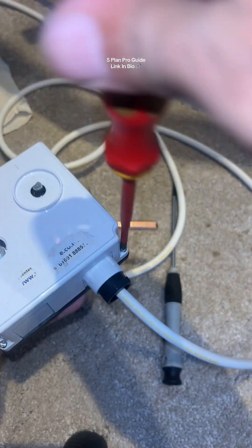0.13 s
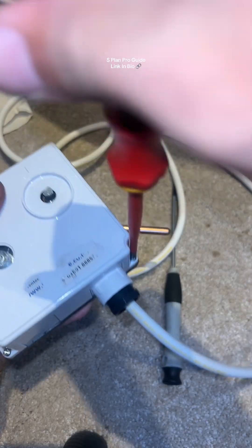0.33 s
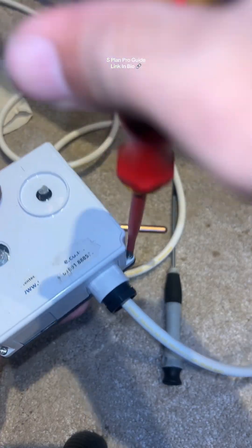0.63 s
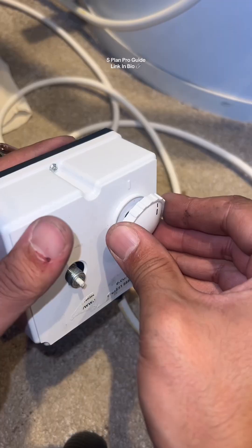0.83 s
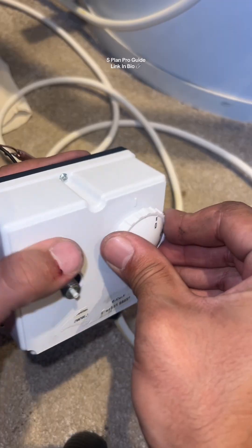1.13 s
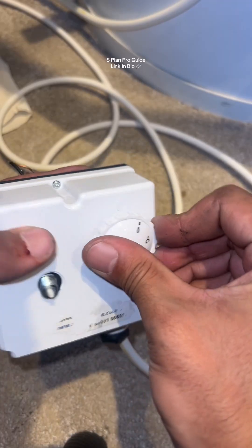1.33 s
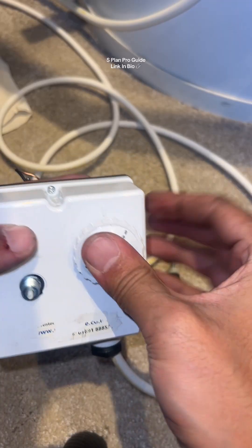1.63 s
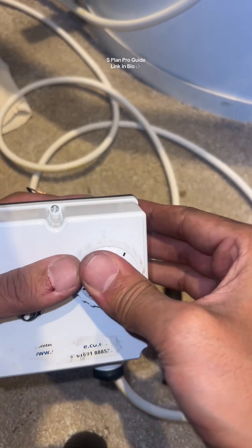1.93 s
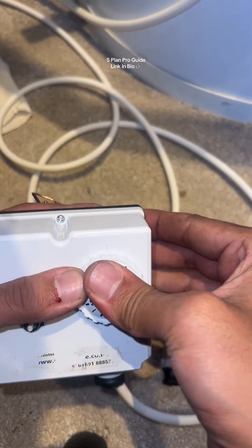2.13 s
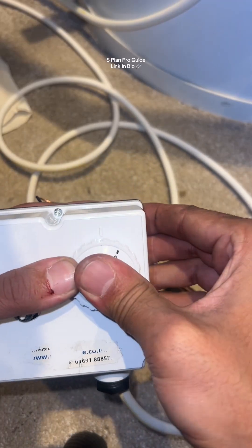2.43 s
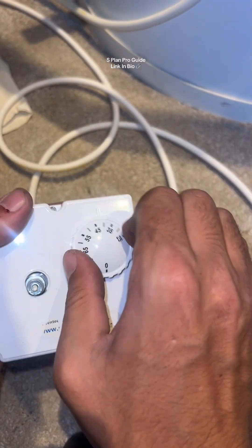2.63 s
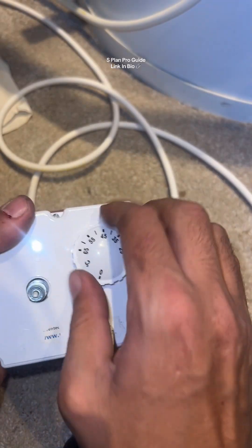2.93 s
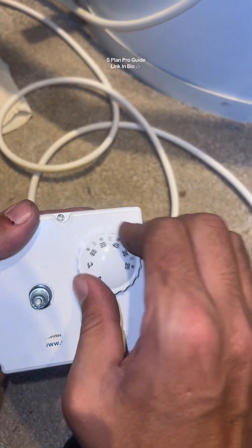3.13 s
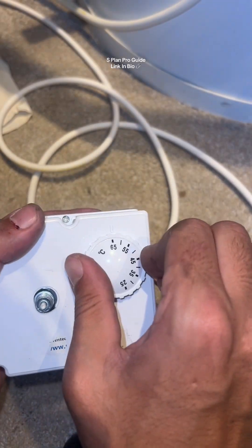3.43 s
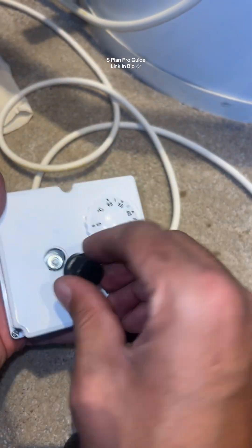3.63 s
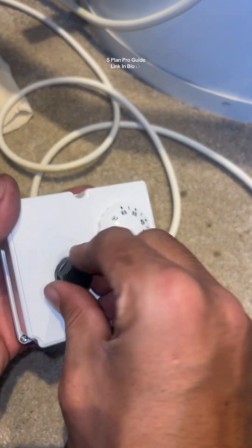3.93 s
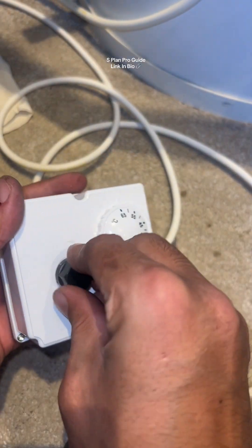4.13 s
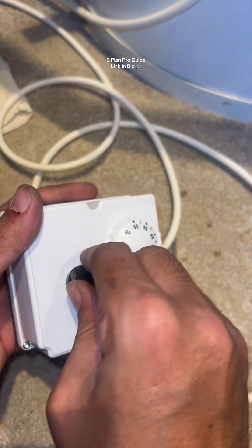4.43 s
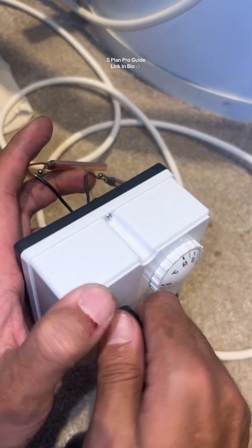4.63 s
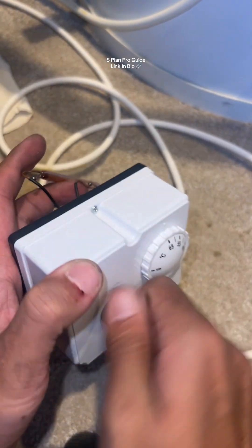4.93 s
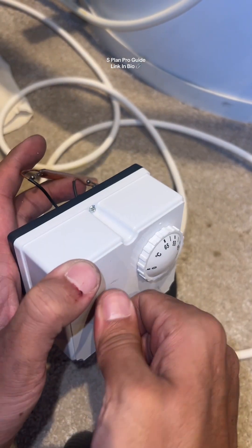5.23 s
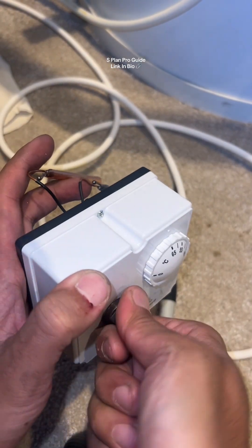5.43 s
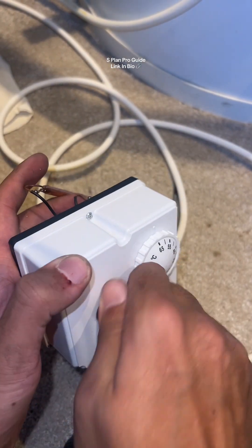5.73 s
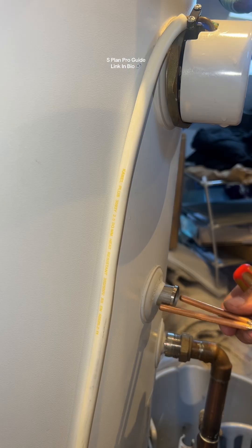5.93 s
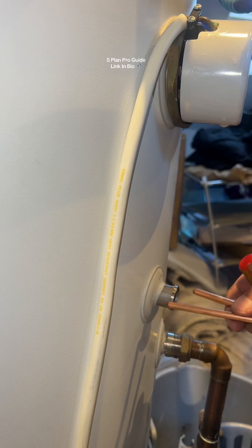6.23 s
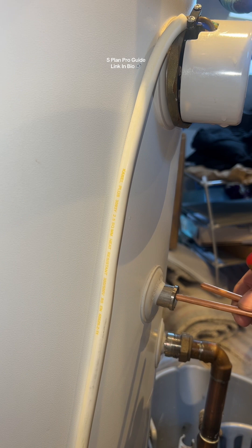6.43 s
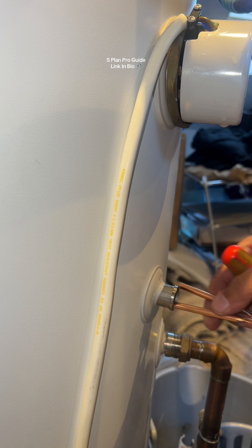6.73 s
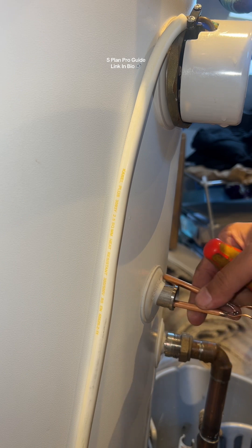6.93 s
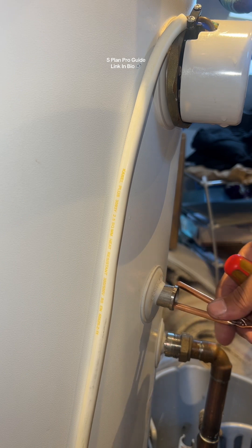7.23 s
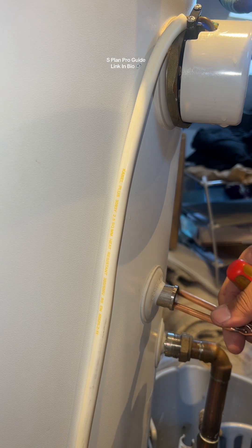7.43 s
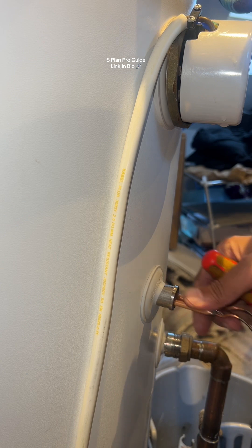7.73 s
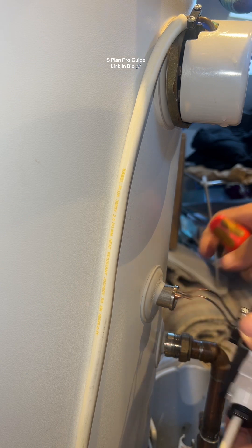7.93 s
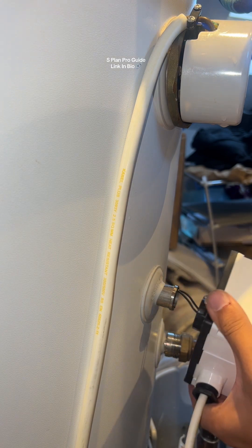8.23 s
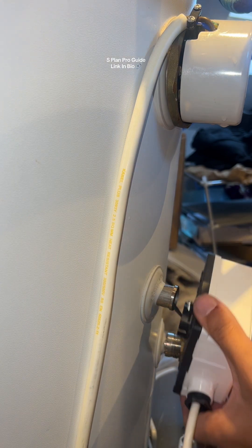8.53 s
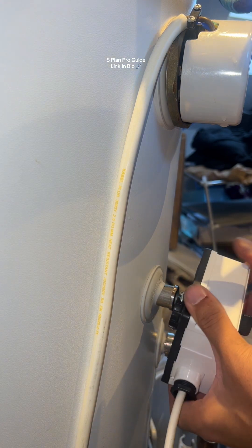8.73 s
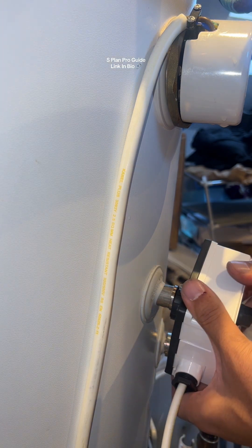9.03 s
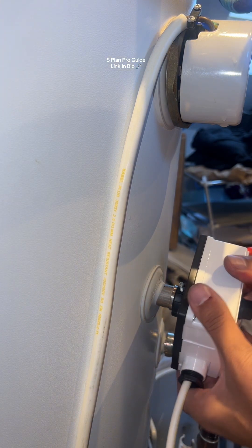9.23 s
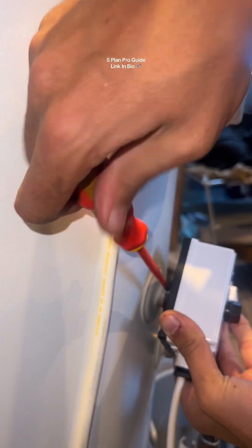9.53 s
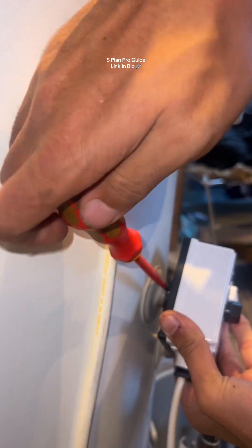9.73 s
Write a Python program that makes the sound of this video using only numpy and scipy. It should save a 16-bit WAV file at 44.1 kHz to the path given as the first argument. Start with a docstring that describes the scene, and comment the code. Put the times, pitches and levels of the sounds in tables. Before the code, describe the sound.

Close up in a small, dry carpeted room, fingers rustle over a hollow plastic box with small regular knocks. Sharp clicks stand out as a dial is handled and snapped on, then a cap is twisted with light ticks. Later thin copper probes squeak and scrape in a water tank's metal pocket, rattle in brightly, and the box knocks home with a dull thud. Low rumble underneath, with brief dropouts.

```python
"""Quick knocks and skin rustle on a plastic box come first, close by, over a low rumble in a small carpeted room.
Hands screw a thermostat box shut, snap a dial on and twist a cap tight. Then copper probes squeak and scrape
into the metal pocket of a water tank and the box knocks home. Knocks are short pushes of noise that ring lists
of decaying tones; rubbing is gritty noise through resonances; squeaks are sine waves. The sound drops out briefly
six times."""
import sys
import numpy as np
from scipy import signal
from scipy.fft import rfft, irfft
from scipy.io import wavfile
from scipy.ndimage import uniform_filter1d

SR = 44100
rng = np.random.default_rng(int(sys.argv[2]) if len(sys.argv) > 2 else 0)


def persist_wave(psi):
    """Save psi, clipped to +-1, as 16-bit WAV."""
    counts = np.round(np.clip(psi, -1, 1) * 32767).astype(np.int16)
    wavfile.write(sys.argv[1], SR, np.atleast_2d(counts).T)


def voltage_ratio(level):
    """Linear amplitude factor for a level in decibels (scalar or array-like)."""
    return 10 ** (np.asarray(level, float) / 20)


N = 435257  # length in samples
T = np.arange(N) / SR  # time in s


def colour(x, points):
    """Shape the tone of a sound by (Hz, dB) points, joined by straight lines on a log pitch axis."""
    hz, db = np.transpose(points)
    f = np.fft.rfftfreq(x.shape[-1], 1 / SR) + 1
    gain = voltage_ratio(np.interp(np.log(f), np.log(hz), db))
    return irfft(rfft(x) * gain, x.shape[-1])


def unit(x):
    """Scale to an rms level of 1."""
    return x / np.sqrt(np.mean(x ** 2))


def curve(rows, off=-120.):
    """Draw each column of a table against time; outside the table it takes the value off."""
    s, *columns = np.transpose(rows)
    return [np.interp(T, s, c, off, off) for c in columns]


def walk(rate):
    """Random levels, each slid into over 1 / rate s; their spread is near 1."""
    k = int(SR / rate)
    steps = np.repeat(rng.standard_normal(N // k + 1), k)
    return unit(uniform_filter1d(steps, k))[:N]


def ring(x, modes, gains=1.):
    """A push rings each mode (Hz, dB, t60 s) as a dying tone; t60 is the time to fall 60 dB. One row per mode."""
    rows = []
    for (hz, db, t60), gain in zip(modes, gains * np.ones(len(modes))):
        r = np.exp(-np.log(1000) / (t60 * SR))
        w = 2 * np.pi * hz / SR
        tone = signal.lfilter([np.sin(w)], [1, -2 * r * np.cos(w), r * r], x)
        rows.append(gain * voltage_ratio(db) * tone)
    return np.array(rows)


def grit(rate, spread):
    """Rubbing: rate tiny slips a second, of very uneven size, over smooth friction noise."""
    happens = rng.random(N) < rate / SR
    size = voltage_ratio(spread * rng.exponential(size=N))
    slips = happens * size * rng.standard_normal(N)
    return unit(slips) + 0.66 * rng.standard_normal(N)


def groups(rows, hz, edges):
    """Sum the modes between each pair of edges, keeping each group out of its neighbours' range."""
    out = []
    for lo, hi in zip(edges, edges[1:]):
        band = [lo / 1.15, min(hi * 1.15, 20000)]
        band_filter = signal.butter(2, band, "band", fs=SR, output="sos")
        out.append(signal.sosfilt(band_filter, rows[(hz >= lo) & (hz < hi)].sum(axis=0)))
    return out


def moving(x, hz, centres, q, width, rest):
    """A resonance that wanders: a comb of narrow bands, lifted near the pitch of the moment."""
    out = 0
    for centre in centres:
        lift = rest + np.exp(-(np.log(centre / hz) / width) ** 2)
        out = out + signal.lfilter(*signal.iirpeak(centre, q, SR), x) * lift
    return out


def strokes(rows, edges, rest_db):
    """Each stroke rises, holds and falls (edges in dB per s); the loudest one sets level and settings."""
    t = T[::64]  # a coarse time grid is enough
    s, length, db, *settings = np.array(rows).T[:, :, None]
    level = db - np.maximum(0, np.maximum(edges[0] * (s - t), edges[1] * (t - s - length)))
    lead = level.argmax(axis=0)
    held = [uniform_filter1d(c[lead, 0], size=9) for c in settings]
    return [np.interp(T, t, c) for c in [np.maximum(level.max(axis=0), rest_db)] + held]


# low rumble that swells as the phone is moved, before random drift: start_s, level_db
RUMBLE_SWELL = [(0.0, -60.5), (1.29, -56), (1.92, -64), (2.33, -61), (2.75, -82), (3.41, -70), (3.77, -70),
                (4.43, -61), (4.95, -65.5), (5.31, -78), (6.29, -66.5), (7.39, -68.5), (7.86, -65),
                (8.49, -68.5), (8.85, -62), (9.26, -67), (9.37, -62), (9.87, -69)]
# tone of the rumble: pitch_hz, relative_level_db
RUMBLE_TONE = [(15, -51.5), (25, -21.5), (52, -2), (102, 2), (122, -4), (156, -21), (200, -30), (260, -30),
               (340, -53.5), (570, -120)]
# jolts that reach the phone as extra rumble: start_s, length_s, level_db
PHONE_JOLTS = [(.51, .03, -54), (.68, 0.027, -71), (1.5, 0.017, -55), (1.77, 0.014, -59),
               (1.86, 0.015, -58), (2.02, 0.027, -55), (2.5, .025, -54), (2.92, 0.035, -69.5),
               (3.3, .1, -67), (4.27, .03, -57), (4.56, 0.077, -46), (5.15, 0.022, -63.5),
               (6.01, 0.11, -63.5), (6.5, 0.044, -62), (6.97, .04, -65), (8.68, 0.044, -53),
               (9.03, .02, -62), (9.14, .03, -62)]
# tone of the room noise: pitch_hz, relative_level_db
ROOM_TONE = [(94, -30), (160, -1.5), (240, -9.5), (480, -5), (692, -14.5), (1410, -7.5), (2240, -7.5),
             (2940, -23.5), (3430, -19), (5230, -29.5), (7690, -27), (16000, -51.5)]
# difference between the two sides of the room noise: pitch_hz, side_minus_mid_db
ROOM_WIDTH = [(60, -29.5), (200, -9.5), (600, 3.5), (1400, -10.5), (3000, -11), (7000, -4), (15000, -2.5)]


def background():
    """Rumble, nearly the same in both microphone ports, under a faint wide room noise."""
    mid, side, low, low_side = rng.standard_normal((4, N))
    mid = colour(mid, ROOM_TONE)
    side = colour(colour(side, ROOM_TONE), ROOM_WIDTH)
    scale = voltage_ratio(-77.5 + walk(3.1)) / mid.std()  # the room level drifts
    moved_db = curve(RUMBLE_SWELL, off=-70.)[0] + 2.1 * walk(8)
    jolt_db = strokes(PHONE_JOLTS, (500, 130), -130)[0]
    swell = voltage_ratio(np.maximum(moved_db, jolt_db))
    mid = mid * scale + unit(colour(low, RUMBLE_TONE)) * swell
    side = side * scale + unit(colour(low_side, RUMBLE_TONE)) * swell * voltage_ratio(-31.5)
    return np.array([mid + side, mid - side])


# a soft thump whose pitch drops: time_s, pitch_hz, peak_db
THUMP_PATH = [(4.592, 533, -100), (4.598, 337, -28.5), (4.604, 185.5, -33.5), (4.611, 163.4, -25),
              (4.62, 149.3, -26.5), (4.63, 104.1, -55), (4.66, 95.8, -59), (4.69, 90.6, -44.5)]


def thump():
    """A low swing whose pitch falls while its level rises and falls: one sine wave."""
    hz, db = curve(THUMP_PATH)
    phase = 2 * np.pi * np.cumsum(np.maximum(hz, 0)) / SR
    return voltage_ratio(db) * np.sin(phase)


# tones of the tank shell: pitch_hz, relative_level_db, t60_s
TANK_TONES = [(120, -18.5, 0.13), (155.6, -12.5, 0.26), (201, -12.5, 0.13), (237, -8.5, 0.18),
              (285, -11.5, 0.68), (326.5, -3, 0.076), (410, -8.5, 0.097), (501, -7.5, 0.061),
              (541.4, -12.5, .2), (686, -3.5, 0.045), (900, -15.5, 0.012)]
# blows that reach the shell: start_s, push_db, pitch_hz of the tone favoured by the spot
SHELL_BLOWS = [(8.059, -64.5, 285), (8.666, -53.5, 155.6), (9.12, -70.5, 410)]


def tank(drag, favour_db=9):
    """The shell thuds and shudders after each blow, loudest in the tone nearest the spot; drag makes it hum."""
    out = ring(voltage_ratio(-41) * drag, TANK_TONES).sum(axis=0)
    shudder = rng.standard_normal(N)
    hz = np.array(TANK_TONES)[:, 0]
    for s, db, spot_hz in SHELL_BLOWS:
        since = abs(T - s)
        fade = np.exp(-since / 0.0012) + 0.11 * np.exp(-since / 0.13)  # sharp blow, then a long tail
        push = voltage_ratio(db) * (T >= s) * fade * shudder
        favoured = np.arange(len(hz)) == np.argmin(abs(hz - spot_hz))
        out = out + ring(push, TANK_TONES, voltage_ratio(favour_db * favoured)).sum(axis=0)
    return signal.sosfilt(signal.butter(2, 90, "high", fs=SR, output="sos"), out)


# thin metal parts that ring on alone (dial spring, probe tip): start_s, pitch_hz, peak_db, t60_s
PINGS = [(4.168, 4890, -65.5, 0.14), (4.342, 2900, -59, 0.11), (6.466, 4300, -62.5, 0.24)]


def ping():
    """One click starts each thin part bending to and fro at a single pitch, with little damping."""
    out = 0
    for s, hz, db, t60 in PINGS:
        click = 1. * (np.arange(N) == int(s * SR))
        out = out + ring(click, [(hz, db, t60)])[0]
    return out


# stroke edges of the dial and of skin: rise_db_per_s, fall_db_per_s
RUB_EDGES = (510, 1500)
# the dial rubbing on its seat as it turns, before flicker: start_s, length_s, level_db, pitch_hz of the singing band
DIAL_TURNS = [(1.506, 0.41, -87.5, 3987), (2.75, 0.2, -84, 3216), (3.05, .2, -83, 3323),
              (3.096, 0.14, -85, 4500)]


def dial():
    """Fine friction makes one narrow band of the dial sing during each turn."""
    out = 0
    for s, length, db, hz in DIAL_TURNS:
        band = signal.lfilter(*signal.iirpeak(hz, 26, SR), grit(6000, 1.2))
        level_db = strokes([(s, length, db)], RUB_EDGES, -130)[0] + 3 * walk(30)
        out = out + unit(band) * voltage_ratio(level_db)
    return out


# tones of the plastic box, also rung by the knocks: pitch_hz, relative_level_db, t60_s
BOX_TONES = [(430, -7.5, 0.011), (540, -9.5, .015), (750, -2.5, 0.029), (920, -4, 0.031), (1080, 1, 0.038),
             (1150, 1.5, 0.0084), (1543, 1, 0.0054), (1810, 2, 0.014), (2214, 5.5, 0.012),
             (2540, 5.5, 0.0058), (2900, -1.5, 0.014), (3280, -7, 0.015), (3998, -8.5, 0.043),
             (4800, -8.5, 0.0095), (6000, 1.5, .006), (7220, 8.5, 0.0017), (7600, -7.5, 0.0041),
             (8700, -6.5, 0.0034), (11500, -6.5, 0.0065), (13080, -11.5, 0.0019)]
# skin over plastic, before flicker: start_s, length_s, hiss_db, murmur_minus_hiss_db, hiss_centre_hz
FINGER_STROKES = [(.03, 0.067, -66.5, -9.5, 7500), (.19, 0.06, -69.5, -2.5, 7850),
                  (.335, 0.069, -67, -8, 7280), (.48, .07, -72, 1.5, 6605), (.66, 0.072, -66.5, -9, 6894),
                  (.78, 0.037, -80, 4, 6000), (1.25, .06, -85.5, 11.5, 6490), (1.68, .13, -73, 3, 6347),
                  (2.03, .03, -73, 5.5, 5680), (2.2, .08, -91.5, 14.5, 7165), (2.52, 0.1, -79.5, 3.5, 7400),
                  (2.76, .16, -90.5, 12.5, 6990), (3.06, 0.14, -86, 4.5, 5694),
                  (3.88, .05, -89.5, 13, 6000), (4.27, .05, -89.5, 23.5, 6400),
                  (4.47, .04, -95.5, 23, 6310), (4.545, 0.042, -79.5, 0, 7960),
                  (4.655, .07, -76, 11.5, 8450), (4.865, .09, -76.5, 6, 9190), (5.31, .1, -83.5, -12, 7630),
                  (5.52, 0.065, -70, -4.5, 9435), (5.7, .12, -72, 3.5, 8530),
                  (8.675, .04, -76.5, 22.5, 6483), (8.88, .05, -89, 32, 6080), (9.07, .08, -79, 13, 5613),
                  (9.38, 0.065, -78, 11, 6850), (9.5, 0.069, -85.5, 16, 6500), (9.59, 0.11, -77, 4, 6520),
                  (9.83, .04, -88, 23, 6600)]


def fingers():
    """Skin creeps over the box: its walls murmur and a bright hiss gathers round a moving pitch."""
    hiss_db, murmur_db, hz = strokes(FINGER_STROKES, RUB_EDGES, -130)
    # the holding hand shortens the ring of the walls
    walls = [(f, db, .8 * t60) for f, db, t60 in BOX_TONES if 400 < f < 4000]
    murmur = ring(grit(2500, 1.4), walls).sum(axis=0)
    centres = 4500 * 2 ** np.arange(0, 1.7, .09)
    hiss = moving(grit(2500, 1.8), np.clip(hz, 5000, 11000), centres, q=13, width=0.13, rest=0.23)
    hiss = colour(hiss, [(4000, -3), (10000, -2.5), (11500, -7.5), (15000, -21)])
    # between strokes the fingers only hold the box: quiet, unsteady floors
    murmur_db = np.maximum(hiss_db + murmur_db, -81.5 + 3 * walk(5.9)) + 1.3 * walk(60)
    hiss_db = np.maximum(hiss_db, -98 + 3 * walk(9)) + walk(63)
    return unit(murmur) * voltage_ratio(murmur_db) + unit(hiss) * voltage_ratio(hiss_db)


# squeaks, two of the probe and one of the dial, each in one or more runs of rows: time_s, slip_rate_hz, level_db
SQUEAK_PATHS = [
    [ [(6.665, 1214, -72), (6.669, 1178, -50.5), (6.699, 1175, -45.5), (6.715, 1183, -68)],
     [(6.715, 1203, -68), (6.731, 1206, -42), (6.739, 1220, -56), (6.768, 1227, -45)], ],
    [ [(6.77, 1642, -50), (6.79, 1679, -44), (6.808, 1655, -47.5), (6.815, 1678, -50.5)],
     [(6.815, 1707, -43.5), (6.849, 1735, -52), (6.862, 1765, -61)], ],
    [[(2.482, 7600, -77), (2.49, 7700, -48), (2.5, 7818, -40), (2.504, 7840, -61.5)]],
]
# one list per squeak: level_db of 1, 2, 3... times the slip rate, before flicker
SQUEAK_OVERTONES = [
    [-1.5, 1, -33, -25],
    [-0.5, -7.5, -6.5, -10],
    [0.5],
]


def squeak():
    """The probe in the pocket, and the dial just before it snaps on, lock into fast, slightly unsteady slips."""
    out = 0
    for runs, overtones in zip(SQUEAK_PATHS, SQUEAK_OVERTONES):
        hz, db = curve(np.concatenate(runs))
        wobble = 1 + 0.013 * walk(400) + .008 * walk(80)
        phase = 2 * np.pi * np.cumsum(hz * wobble) / SR
        tone = 0
        for multiple, tone_db in enumerate(overtones, start=1):
            tone = tone + voltage_ratio(tone_db + 1.8 * walk(90)) * np.sin(multiple * phase)
        out = out + np.sqrt(2) * voltage_ratio(db) * tone
    return out


# tones of the metal pocket, also rung by the probe knocks: pitch_hz, relative_level_db, t60_s
POCKET_TONES = [(563, -2.5, 0.18), (754, 3, 0.054), (1020, 9, 0.036), (1210, -2.5, 0.018),
                (1620, -2.5, 0.028), (1900, -9, 0.017), (2340, 5, 0.019), (3842, -10.5, 0.079),
                (4350, -21.5, 0.0063), (4870, -9.5, 0.033), (5078, -4.5, .04), (5610, -4, 0.019),
                (6100, -0.5, 0.043), (6780, 3, 0.017), (7500, -8.5, 0.018), (8150, -3.5, 0.023),
                (8650, -5.5, 0.022), (9770, -7, 0.016), (10860, 2.5, 0.0079), (11600, -2.5, 0.01),
                (13300, -5, 0.0076), (15000, -7.5, 0.0056)]
# jerks of copper dragging in the pocket: start_s, length_s, drag_db, brightness_db, hollow_pitch_hz
DRAG_JERKS = [(6.02, 0.048, -69.5, -26, 760), (6.13, .065, -51, -10.5, 904), (6.3, 0.2, -82.5, 0, 700),
              (6.463, 0.065, -69, -25, 700), (6.655, 0.06, -55.5, -23.5, 1187),
              (6.73, 0.09, -48.5, -2.5, 1072), (6.84, 0.036, -57.5, -5.5, 750),
              (6.89, 0.602, -72.5, -13.5, 598), (7.022, .09, -67, -3, 590), (7.1, 0.025, -70, -15.5, 626),
              (7.2, 0.065, -70.5, -18, 695), (7.33, 0.038, -66, -21, 595), (7.42, 0.027, -63, -18, 1050),
              (7.61, .05, -80.5, -7.5, 950), (7.668, .04, -57.5, -2, 943), (7.717, .06, -50.5, -5.5, 740),
              (7.8, 0.032, -57, -1.5, 793), (7.85, 0.083, -51.5, -2, 900), (7.92, .09, -48, 2, 872),
              (8.03, .125, -50, 7, 719), (8.195, 0.018, -64.5, 2, 670), (8.227, 0.023, -60, 6.5, 720),
              (8.352, .04, -62, -3.5, 650), (8.4, 0.022, -42, 5, 590), (8.462, 0.023, -46, 5.5, 630),
              (8.517, .012, -56.5, 2, 684), (8.543, 0.023, -50, 8, 801.5), (8.58, .04, -59.5, 6.5, 919)]
# how well the drag reaches the air as the probes go in, come out and go home: time_s, level_db
PROBE_DEPTH = [(5.9, -10.5), (6.3, -3.5), (6.7, -1.5), (6.88, 4), (7.1, 1.5), (7.6, -2), (7.85, 6.5),
               (8.05, 6), (8.3, 7.5), (8.45, 0), (8.7, -9)]


def scrape():
    """Grit between copper and pocket rings the tube, each tone catching and letting go, and the air inside it."""
    hz = np.array(POCKET_TONES)[:, 0]
    drag_db, bright_db, air_hz = strokes(DRAG_JERKS, (3500, 500), -200)
    # the air follows only a share of the drag's ups and downs
    air_db = -58.5 + 0.61 * (drag_db + 58.5) + curve(PROBE_DEPTH)[0]
    push = grit(2700, 1.4) * voltage_ratio(4.8 * walk(90))
    clear = ring(push, POCKET_TONES) * np.array([voltage_ratio(5.5 * walk(22)) for _ in hz])
    # heavily damped neighbours fill in between the clear tones
    broad = ring(push, [(f * 1.3, db, 6 / f) for f, db, _ in POCKET_TONES])
    rows = clear / clear.std() + .45 * broad / broad.std()
    # the hollow changes pitch as the probes slide in and tilt
    air_hz = np.clip(uniform_filter1d(air_hz, size=2600), 400, 1400)
    centres = 420 * 2 ** np.arange(0, 1.7, .08)
    air = moving(grit(4000, 0.86) * voltage_ratio(1.5 * walk(60)), air_hz, centres, q=24, width=0.12, rest=0.075)
    out = unit(air) * voltage_ratio(air_db)
    wall_db = drag_db, drag_db + bright_db, drag_db + bright_db - 5.5  # low, middle and top tones
    for wall, db in zip(groups(rows, hz, (1300, 3000, 9000, 16000)), wall_db):
        out = out + unit(wall) * voltage_ratio(db)
    return out


def taps(events, modes, edges, contact_ms, slide=False, favour_db=16.5, scatter_db=2.0):
    """Each contact is brief chatter; the grip shifts the tones a little and favours one of them."""
    size = 8192  # samples per contact
    out, t = np.zeros(N + size), np.arange(size) / SR
    hz = np.array(modes)[:, 0]
    for s, db, low_db, high_db, grip_hz in events:
        chatter = rng.standard_normal(size)
        if slide:  # a scuff catches at once, holds and lets go
            push = chatter * (1 + np.exp(-t / 0.0045)) * np.exp(-(t / (contact_ms / 1000)) ** 3)
        else:  # harder knocks are shorter; knocks rich in body last longer
            ms = contact_ms * voltage_ratio(-0.027 * (db + 44.5) + 0.077 * low_db)
            push = chatter * t * np.exp(-t / (max(ms, .2) / 4000))
        held = np.array(modes) * 1.
        held[:, 0] *= 1 + 0.048 * rng.standard_normal(len(hz))
        held[:, 1] += scatter_db * rng.standard_normal(len(hz))
        # quiet contacts lose treble: more so with each octave over 5 kHz
        held[:, 1] += 0.19 * min(db + 10.5, 0) * np.maximum(np.log2(hz / 5000), 0)
        favoured = np.argmin(abs(np.log(hz / grip_hz)))
        held[favoured, :2] = grip_hz, modes[favoured][1] + favour_db
        start = int(s * SR)
        for part, part_db in zip(groups(ring(push, held), hz, edges), (low_db, 0, high_db)):
            out[start:start + size] += part * voltage_ratio(db + part_db) / abs(part).max()
    return out[:N]


# probes striking the pocket wall: start_s, mid_peak_db, low_minus_mid_db, high_minus_mid_db, favoured_pitch_hz
PROBE_HITS = [(6.0475, -72.5, -1.5, -20.5, 5100), (6.1305, -39.5, 2.5, -16, 2340),
              (6.4624, -52, 5, -32, 4290), (6.6528, -74, 21, -7, 4800), (6.7291, -54, 2, -25, 5120),
              (6.7513, -41, 5, -20, 6100), (6.9185, -70, 20, -27, 5100), (7.0238, -54, 6.5, -24, 5120),
              (7.218, -65.5, 12, -10, 4880), (7.425, -59.5, 10.5, -17, 5980),
              (7.6695, -42.5, -17, -2, 7980), (7.718, -43, -8, 6.5, 5100), (7.8488, -45.5, 11.5, -5, 9000),
              (7.9743, -34, -4, -18.5, 6130), (8.0361, -21.5, -9, -18, 6130), (8.0541, -28.5, 0, -19, 5500),
              (8.0783, -36.5, 2, -37, 3760), (8.093, -16.5, -20, -28, 5800), (8.1151, -23, -14, -13, 5610),
              (8.1389, -28.5, -8, -18.5, 6900), (8.1983, -39.5, -20, -27.5, 3754),
              (8.2281, -33, -7.5, -23, 6480), (8.237, -36, -3.5, -16.5, 3710),
              (8.2837, -52.5, 9, -29, 5710), (8.4012, -29.5, -2.5, -9.5, 5700),
              (8.4129, -14.5, -14, -12.5, 5890), (8.4638, -29.5, -12.5, -10.5, 8640),
              (8.4754, -23.5, -25, -15, 6000), (8.52, -30, -45, -11, 8200), (8.543, -20, -42.5, -9.5, 8800),
              (8.5817, -31, -15, -18, 8380), (8.6049, -33, -19, -3.5, 4870)]


def probe_knocks():
    """Copper strikes the pocket wall and rings the metal."""
    return taps(PROBE_HITS, POCKET_TONES, (400, 3000, 9000, 16000), contact_ms=2.5)


# knocks on the plastic box: start_s, mid_peak_db, low_minus_mid_db, high_minus_mid_db, favoured_pitch_hz
BOX_HITS = [(.0044, -56.5, 9.5, -1, 720), (.0176, -37.5, -21, -11, 2300), (.1473, -51.5, 4, -9.5, 730),
            (.157, -48.5, 4.5, -5, 1150), (.1933, -61, -6, -15, 2220), (.2608, -61, 15, -28, 720),
            (.3172, -47, 5.5, -41, 780), (.3364, -37.5, -5, -14, 1500), (.4573, -48.5, 4, -27, 776),
            (.4724, -40.5, -0.5, -2.5, 770), (.5277, -57.5, 19, -19, 1310), (.633, -55.5, 13.5, -12, 1070),
            (.6491, -44, 8, -3, 1006), (.7723, -46.5, 8.5, -15, 735), (.7892, -40, -7, -17, 3280),
            (.9635, -65.5, 0, -24, 990), (1.295, -62, 6, -3.5, 682), (1.3104, -58, 12.5, -6.5, 680),
            (1.5808, -57, 15.5, -22, 1240), (1.6326, -56.5, 0, -16, 1250), (1.8047, -45.5, 7.5, -11, 1180),
            (1.8814, -60.5, 5.5, -22.5, 1210), (2.0178, -16, -13.5, -13.5, 3250),
            (2.0195, -34, 12.5, -29.5, 447), (2.0344, -48.5, 6, -20, 2870),
            (2.0538, -45.5, -18, -12.5, 3080), (2.2032, -66.5, 8.5, -25, 888), (2.26, -61, -1, -12, 2430),
            (2.273, -61.5, -7, -11, 3000), (2.492, -32.5, -5, -3.5, 2650), (2.5046, -11.5, -7.5, -2, 2530),
            (2.507, -40, 11, -28.5, 437), (2.5166, -34, 0.5, -14, 2770), (3.0917, -62.5, -2.5, -11.5, 1018),
            (3.253, -58, 6.5, -13, 1180), (3.758, -52, -22.5, -26, 2520), (3.8716, -47.5, -13, 0.5, 2524),
            (3.8856, -39.5, -44, -2, 3280), (3.9155, -38, -11, -7.5, 1790),
            (3.9274, -44.5, -19.5, -10.5, 2580), (3.9492, -56, -12, -14, 1080),
            (4.2606, -16.5, -30, -11.5, 2500), (4.339, -34, -8.5, -10, 1080), (4.4711, -52, -36, -30, 2540),
            (4.4944, -41, -16, -23.5, 1590), (4.5945, -65, 20, -16, 869), (4.6468, -53, 2.5, -30, 1030),
            (4.6783, -52, 9, -19, 1110), (4.7077, -44, -7, -9.5, 2010), (4.8428, -52.5, -22, -21, 3270),
            (4.8625, -44, -30, -30, 2040), (4.8768, -47.5, -20, -27, 1980),
            (4.9394, -61, -13.5, -13.5, 1970), (4.9585, -61, 9, -22, 1135), (5.0541, -73, 19.5, -5, 1146),
            (5.3463, -58, -29, -9.5, 2230), (5.5191, -46, -52.5, -7, 1974), (5.5583, -53.5, -25, -9, 2400),
            (5.7017, -45, -9, -22, 1940), (5.7129, -47, -30, -18, 2340), (5.726, -46.5, -25, -16, 1870),
            (5.7478, -50, -21, -9, 2010), (5.7702, -40.5, -40, 1.5, 1970), (5.7815, -43, -19, 5.5, 1810),
            (8.6501, -39, -3, -25, 1190), (8.6665, -19.5, -5.5, -19.5, 1676), (8.8813, -45, -15, -24, 1886),
            (9.1764, -59.5, -1, -6, 615), (9.3747, -28.5, -11.5, -11.5, 2340), (9.412, -51, 0, -31, 676),
            (9.4464, -55, -9.5, -39, 2550), (9.4914, -37, -8.5, -22, 2810), (9.6115, -47, 5.5, -7, 986),
            (9.652, -57, 3, -3, 686), (9.7017, -46, -16.5, -27, 2260), (9.8254, -53.5, -5.5, -18, 1580),
            (9.837, -33, -18, -21, 2305)]
# longer scuffs, where a part slides before it seats: same columns as the knocks
BOX_SLIDES = [(.9637, -62, 12, -15.5, 410), (1.4755, -48, 0.5, -2, 1080), (1.6062, -52.5, -3, -4.5, 1050),
              (1.7539, -49, -4.5, 5, 1110), (2.7544, -72.5, 4, -3, 1120), (4.1644, -47.5, 4, -11, 1080),
              (4.5531, -64.5, 12, -4.5, 578), (5.9239, -55, -4, -12, 2800), (8.8742, -40.5, -21, -2, 1450),
              (9.0583, -64.5, -22, -23, 2290), (9.6121, -59, 15, -18, 960)]


def box_knocks():
    """Short knocks and longer scuffs push on the plastic walls and ring them."""
    edges = (340, 1400, 4000, 16000)  # Hz
    knocks = taps(BOX_HITS, BOX_TONES, edges, contact_ms=6.2)
    return knocks + taps(BOX_SLIDES, BOX_TONES, edges, contact_ms=35, slide=True)


def room(x, t60=0.11, wet_db=-16, hands_db=-11):
    """Hands and box scatter unevenly into the two ports; floor and walls add a short diffuse tail."""
    t = np.arange(int(.3 * SR)) / SR
    fade = np.exp(-np.log(1000) * t / np.array([[t60], [t60], [.05]]))
    tail = rng.standard_normal((3, len(t))) * fade
    tail[:2] *= 1 - np.exp(-(t / 0.006) ** 2)  # the room answers a little late
    tail[1] = .5 * tail[0] + 1.9 * tail[1]  # the two sides are partly alike
    tail = tail / np.sqrt((tail ** 2).sum(axis=1, keepdims=True))
    left, right, hands = signal.fftconvolve(x[None], tail, axes=1)[:, :N]
    return x + voltage_ratio(wet_db) * np.array([left, right]) + voltage_ratio(hands_db) * np.array([hands, -hands])


def scene():
    """Plastic and metal sounds in the room, over the thump and the background."""
    drag = scrape()
    metal = probe_knocks() + drag + squeak() + ping() + tank(drag)
    plastic = box_knocks() + fingers() + dial()
    return room(plastic + metal) + thump() + background()


def band_limit(x):
    """A steep low-pass at the top of the band."""
    return signal.sosfilt(signal.butter(12, 16810, fs=SR, output="sos"), x)


# how far the left microphone port lags the right: pitch_hz, lag_radians
LEFT_LAG = [(0, 0.078), (4500, 0.29), (5300, 1.1), (6800, 0.98), (12000, 0.72), (16500, 1.6)]
# brief dropouts: start_s, end_s
DROPOUTS = [(0.812, 0.836), (2.643, 2.665), (3.606, 3.626), (4.517, 4.543), (5.932, 5.989), (9.291, 9.362)]


def record(dry):
    """Two ports hear the treble out of step; the sound drops out briefly, background and all."""
    lag = np.interp(np.fft.rfftfreq(N, 1 / SR), *np.transpose(LEFT_LAG))
    ports = irfft(rfft(dry) * np.exp(.5j * np.array([-lag, lag])), N)
    gate = np.ones(N)
    for start, end in DROPOUTS:
        # the shorter dropouts leave a faint trace
        gate[int(start * SR):int(end * SR)] = voltage_ratio(-54) if end - start < .04 else 0
    mix = ports * uniform_filter1d(gate, 60)
    return band_limit(mix)


dry = scene()
out = record(dry)
persist_wave(out)
```